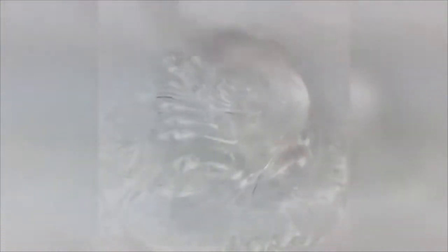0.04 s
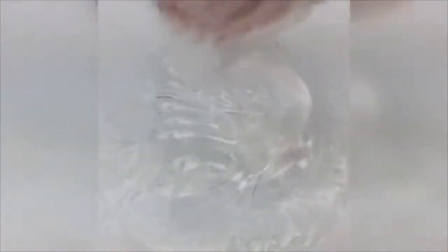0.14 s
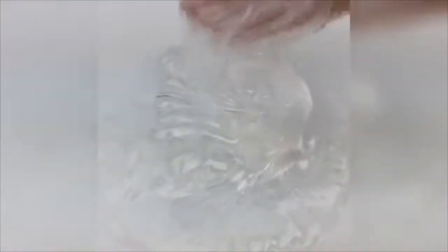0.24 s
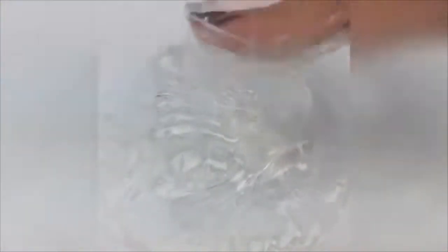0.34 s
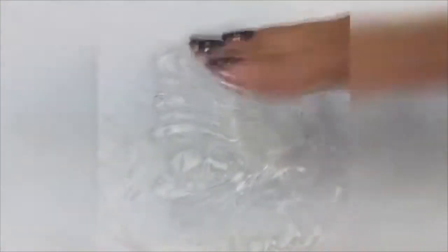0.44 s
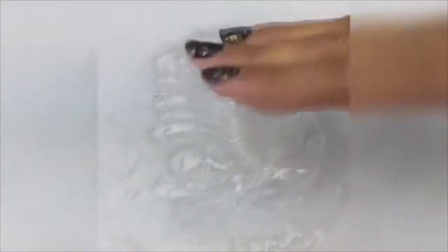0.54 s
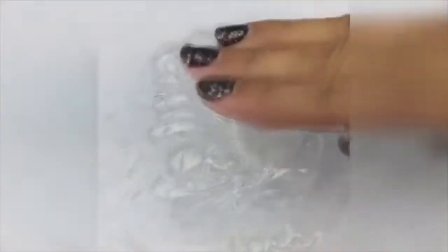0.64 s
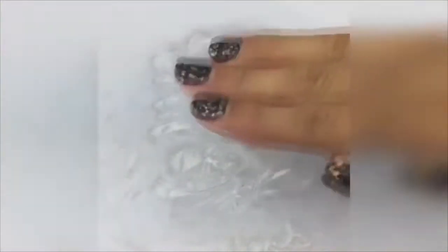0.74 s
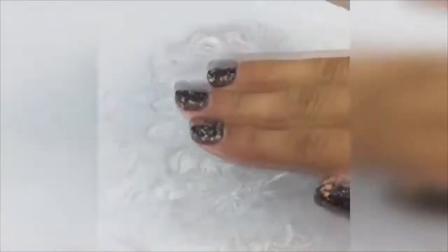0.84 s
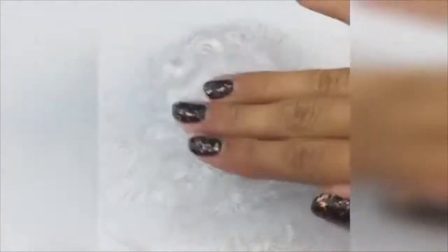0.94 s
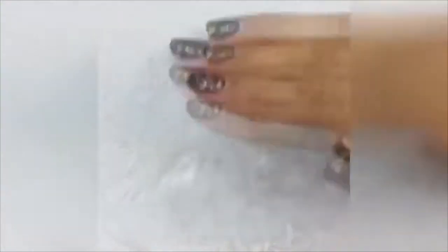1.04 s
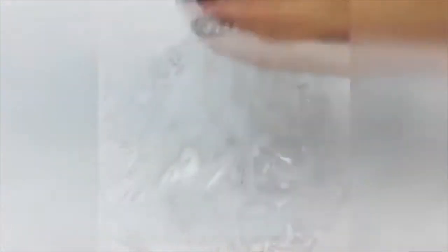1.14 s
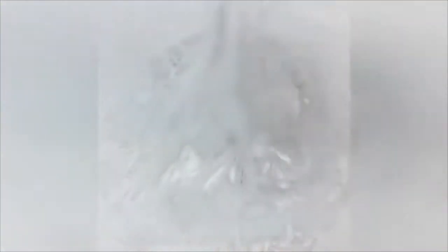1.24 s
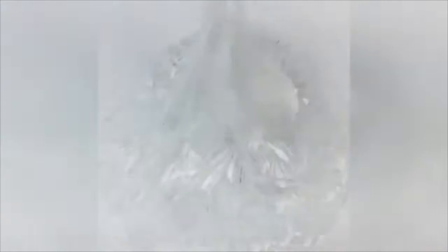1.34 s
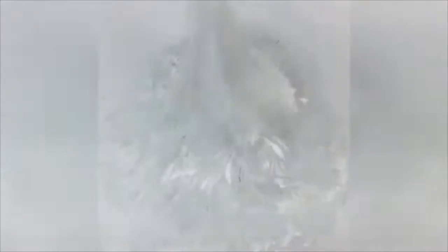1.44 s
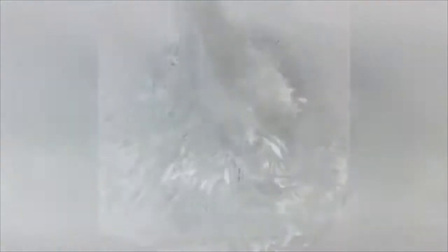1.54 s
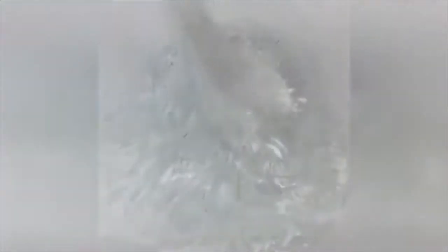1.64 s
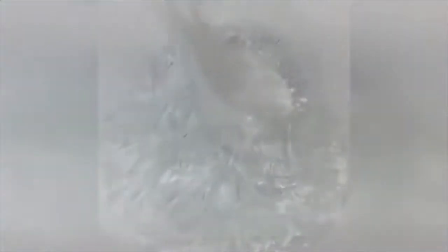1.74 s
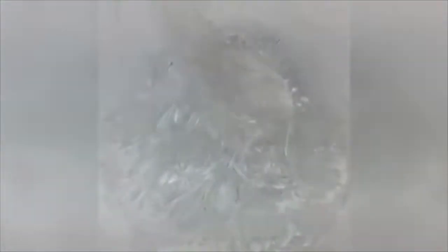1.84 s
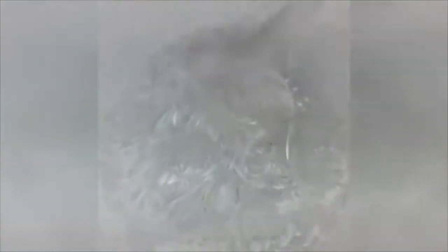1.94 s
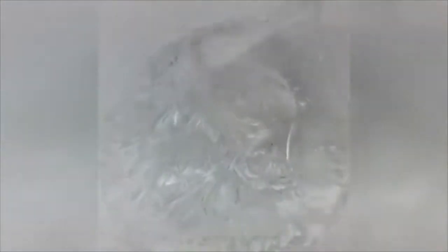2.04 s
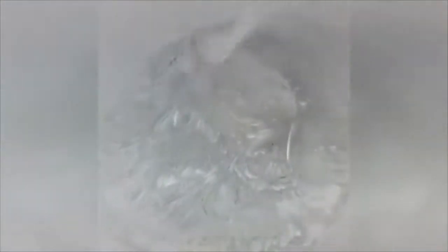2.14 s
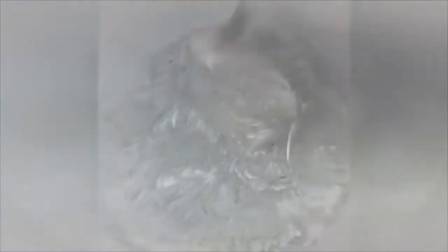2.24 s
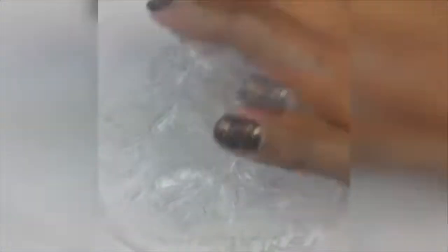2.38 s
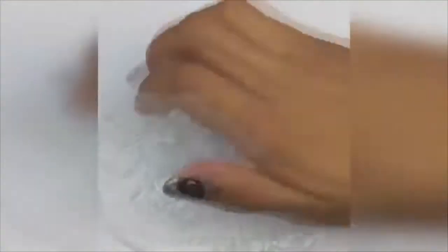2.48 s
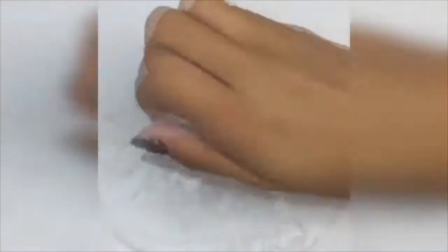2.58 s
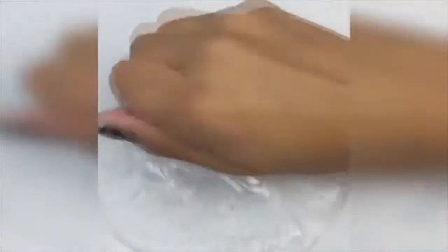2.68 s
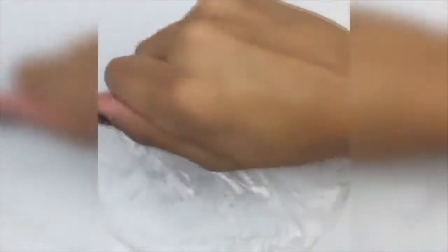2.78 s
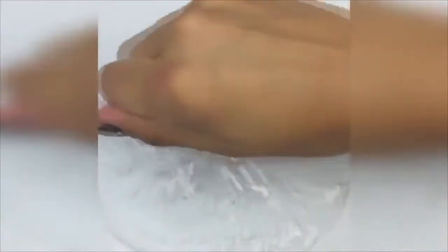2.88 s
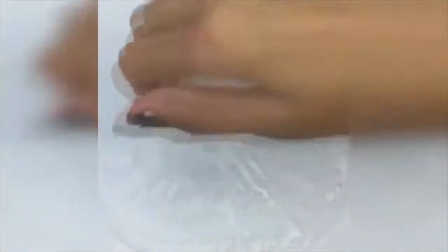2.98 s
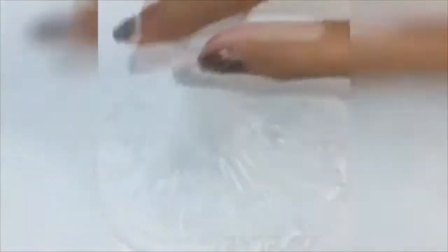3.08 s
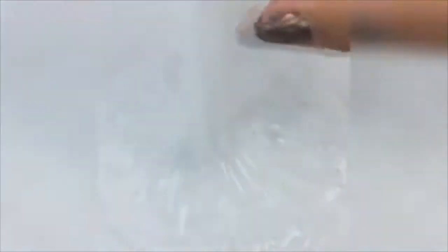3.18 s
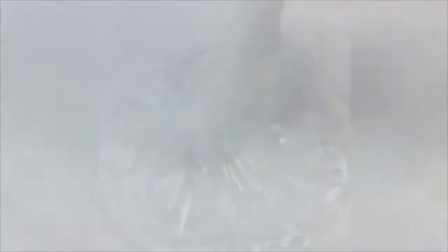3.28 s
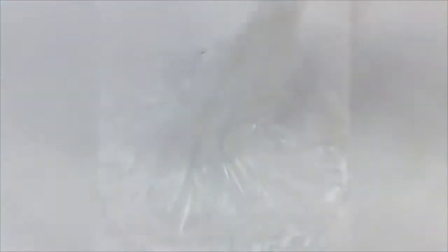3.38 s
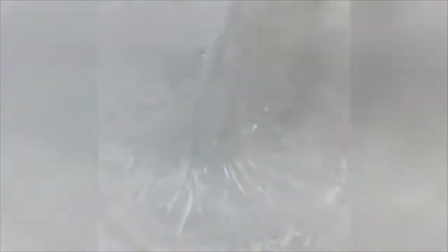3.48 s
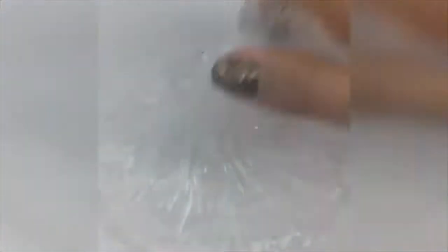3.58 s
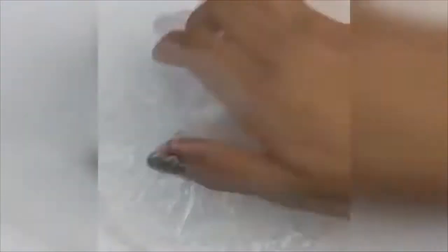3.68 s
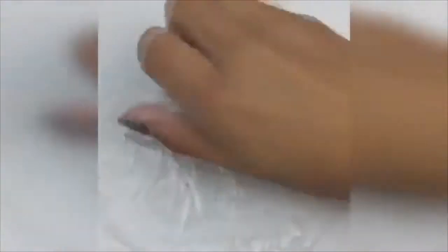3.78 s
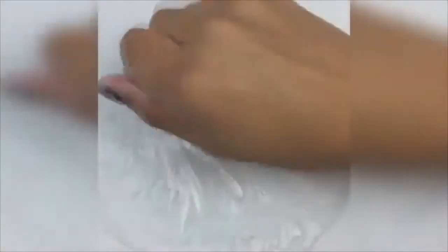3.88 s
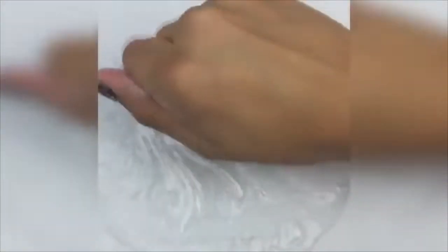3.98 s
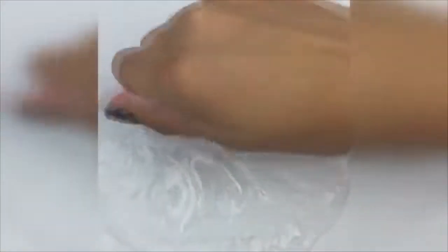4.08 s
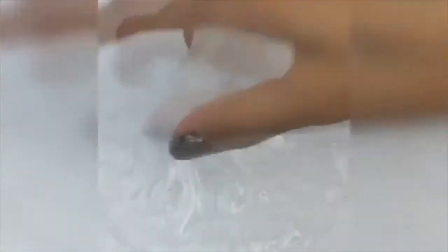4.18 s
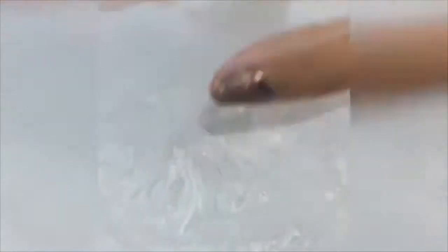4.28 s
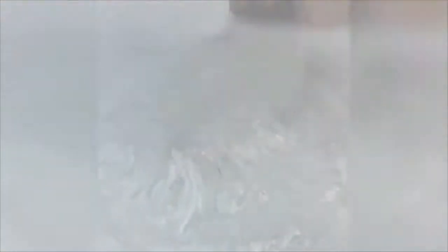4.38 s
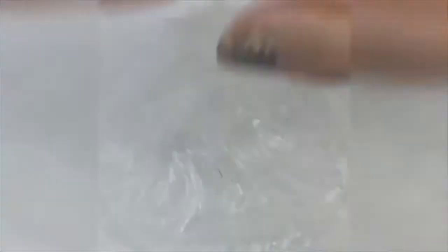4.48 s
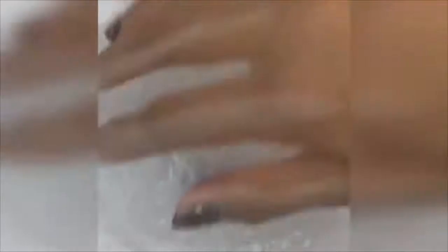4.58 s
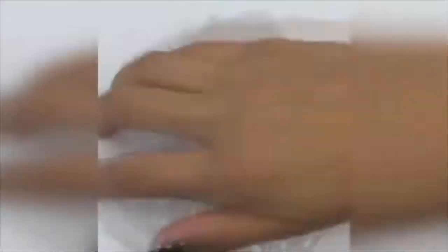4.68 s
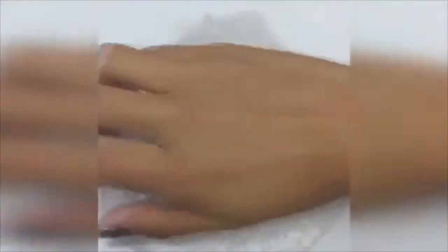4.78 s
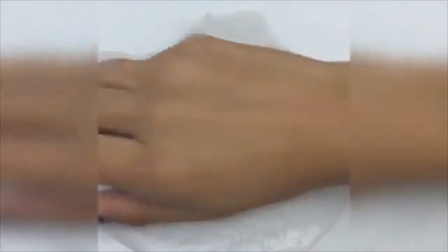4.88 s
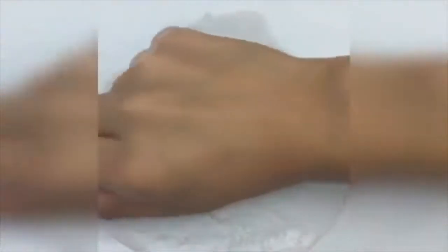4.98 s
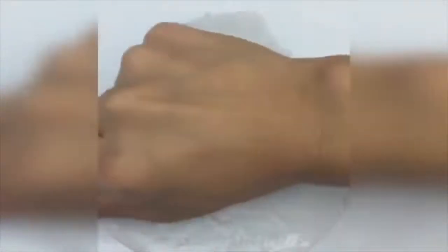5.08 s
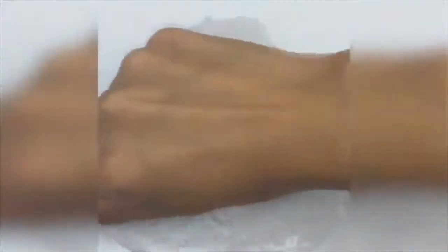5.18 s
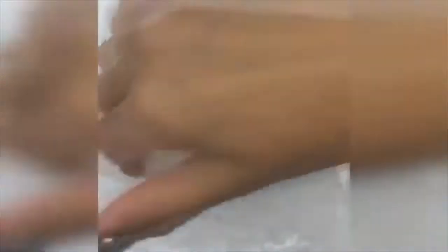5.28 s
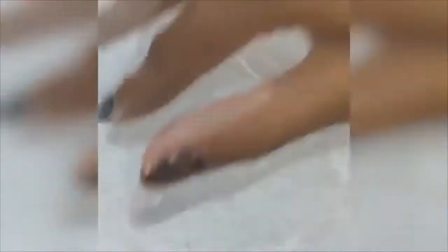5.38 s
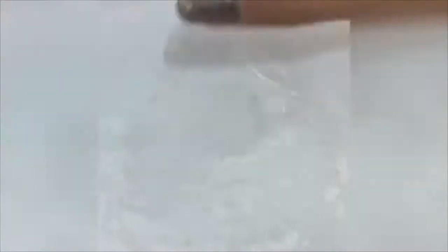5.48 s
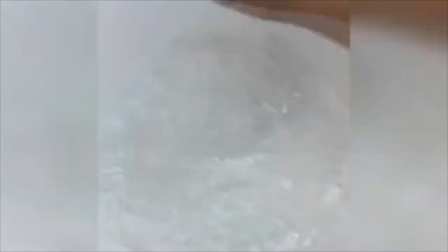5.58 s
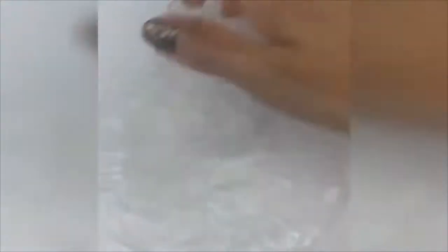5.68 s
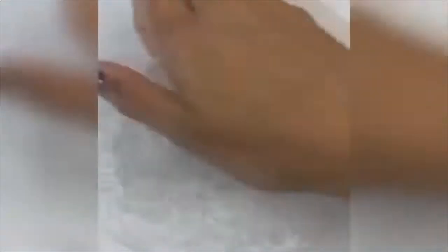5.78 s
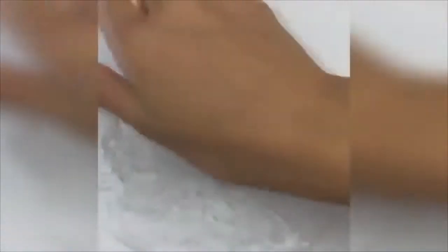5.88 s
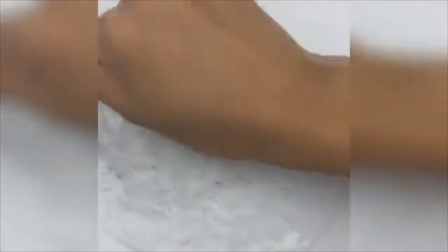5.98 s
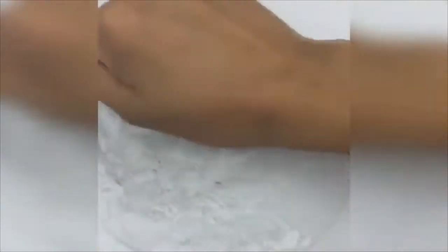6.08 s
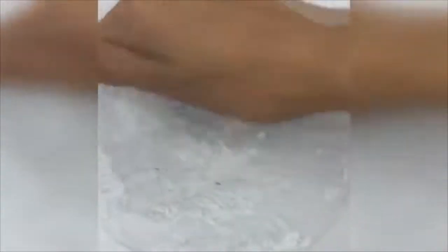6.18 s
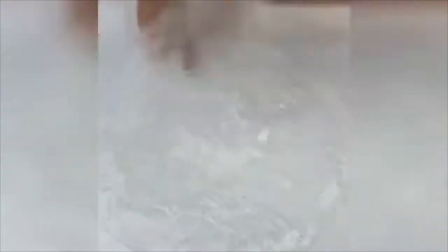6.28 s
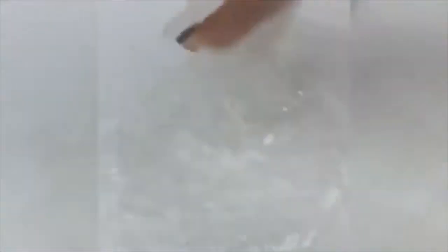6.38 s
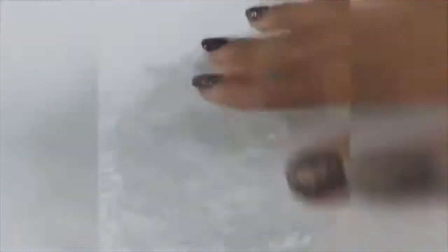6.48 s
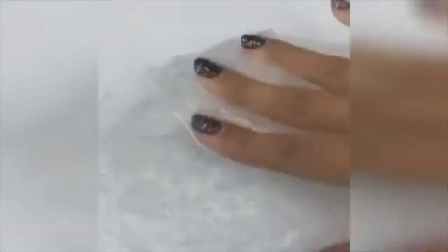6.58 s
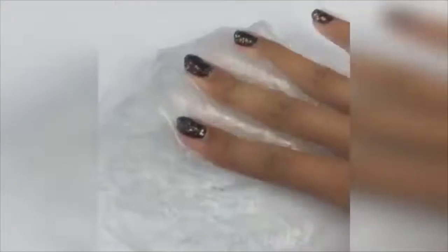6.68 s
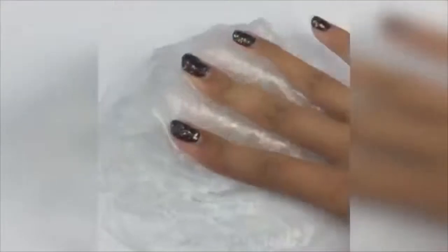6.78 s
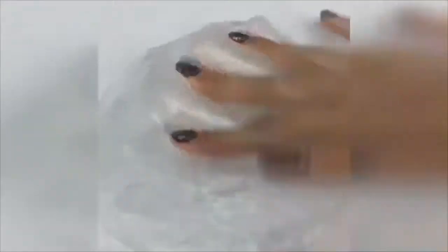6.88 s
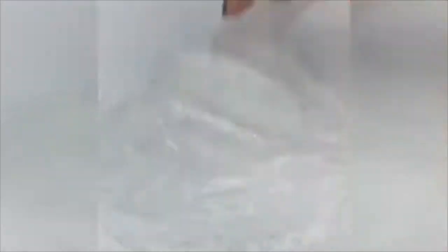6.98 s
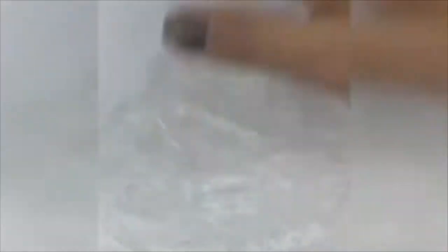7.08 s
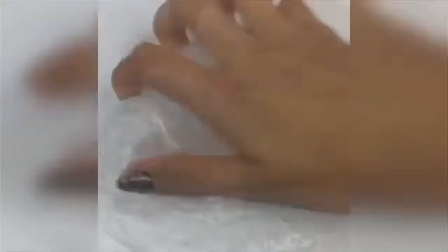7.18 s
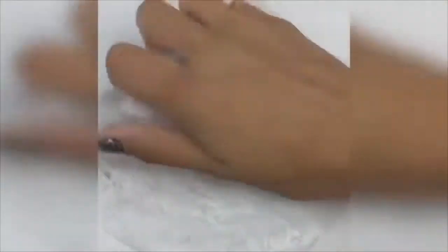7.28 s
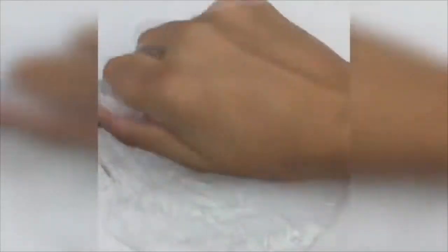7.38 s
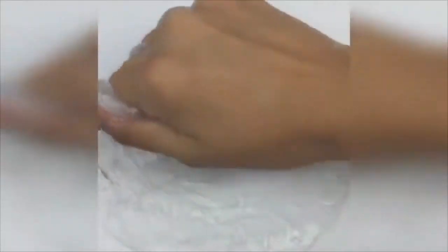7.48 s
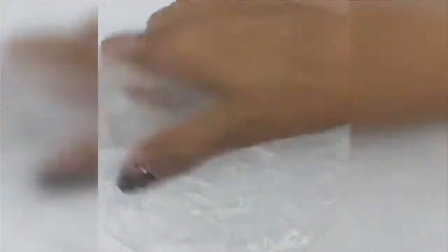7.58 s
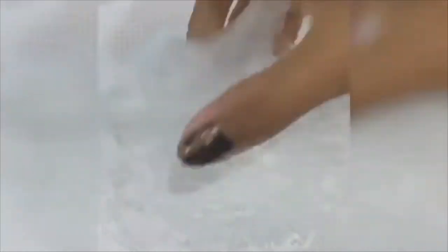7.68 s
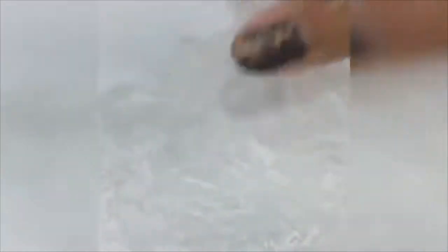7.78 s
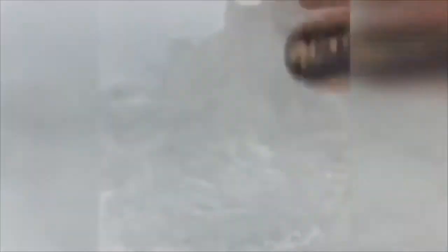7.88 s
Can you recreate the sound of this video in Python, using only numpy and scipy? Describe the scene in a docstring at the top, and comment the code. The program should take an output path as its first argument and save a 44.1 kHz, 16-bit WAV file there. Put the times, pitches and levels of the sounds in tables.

```python
"""In a small quiet room, a hand kneads clear slime in a plastic tub, heard from close by.
Each squeeze swells, holds and dies away in a crackle of tiny bubbles, with stray small pops in it.
Larger air pockets tear open and ring briefly; the loudest pops leave a fizzing tail.
The tub thuds and the table rumbles under each push, and the tub knocks on the table as it shifts.
A faint hiss and rumble lie under it all."""
import sys
import numpy as np
from scipy import signal
from scipy.fft import rfft, irfft
from scipy.io import wavfile
from scipy.ndimage import uniform_filter1d

SR = 44100
rng = np.random.default_rng(int(sys.argv[2]) if len(sys.argv) > 2 else 0)


def transcribe(signal):
    """Save signal, clipped to [-1, 1], as a 16-bit WAV file at the path in sys.argv[1]."""
    frames = np.atleast_2d(signal).T
    limited = np.clip(frames, -1, 1)
    pcm = np.round(limited * 32767).astype(np.int16)
    wavfile.write(sys.argv[1], SR, pcm)


N = 349838

# Tone of the room's background: (frequency [Hz], relative level [dB])
BACKGROUND_COLOUR = [(19, -36), (32, -14), (62, -1.5), (92, -16.5), (126, 1.76), (168, -9.5), (258, -13.5),
                     (324, -16.5), (359, -24), (1280, -28.5), (14000, -37)]
# Larger air pockets; the level is that of the pop's energy spread over 1 ms:
# (time [s], level [dB], pitch [Hz], fade time of the tear [s], boost of the low puff [dB])
AIR_POCKETS = [(.0488, -45, 5440, .0028, 6), (.051, -45, 1780, 0.0017, -19),
               (.7107, -50.5, 4120, 0.0022, 9), (1.2053, -31, 5000, 0.0039, 6.5),
               (1.2248, -26, 2500, 0.0028, -1), (1.268, -42, 940, 0.003, -10),
               (1.4194, -37.5, 1910, 0.013, 0), (1.439, -42, 3920, 0.0028, -6),
               (1.6279, -49.5, 9600, .003, 11), (1.8757, -44, 7550, 0.0069, 0),
               (1.902, -49, 8400, 0.0022, -4), (2.687, -42, 5165, 0.0031, 2.5),
               (2.6934, -32, 992, 0.0036, -9.5), (2.7336, -31, 2280, .0042, -20.5),
               (2.7496, -31, 8000, 0.0016, 0.5), (2.8026, -20.5, 2100, 0.0022, -2.5),
               (2.8212, -24.5, 6660, 0.00043, -13.5), (2.8385, -18, 7450, 0.00062, 6),
               (2.8401, -16, 1980, 0.0041, 0), (2.8659, -14.5, 7600, 0.002, -7.5),
               (2.886, -2.5, 6784, 0.0015, 10.5), (2.8945, -13.5, 690, 0.0025, -4.5),
               (2.902, -20, 236, 0.0035, 0), (2.9119, -5, 5930, 0.0027, 0), (2.914, -6.5, 2040, 0.0011, 8),
               (2.9205, -11, 8800, 0.0022, 0.5), (2.9357, -24.5, 8000, 0.0028, 12),
               (2.9576, -11, 7000, .002, -0.5), (2.9987, -12, 6500, 0.0063, -6),
               (3.0138, -18, 2680, .0018, 3), (3.0779, -32, 5900, 0.0033, -8),
               (3.3533, -36.5, 6056, 0.0024, -15), (3.4119, -27, 10700, 0.0075, -10),
               (3.5102, -25, 8000, 0.0044, -6), (3.617, -48, 6470, .005, -8),
               (3.8958, -42, 2010, 0.0024, -8.5), (3.9943, -14, 1710, 0.0038, -4.5),
               (4.0067, -15, 1718, 0.0014, 1), (4.0128, -15.5, 1400, 0.0038, 4),
               (4.0732, -19.5, 2070, 0.00059, -7), (4.0909, -22, 2680, 0.0014, -5),
               (4.1354, -27, 4200, 0.0028, -7), (4.1653, -26, 4200, 0.0011, -15),
               (4.2089, -19.5, 2180, 0.0041, -19.5), (4.4286, -38, 9000, 0.0036, -10),
               (4.454, -34, 6970, .0014, -5.5), (4.901, -47, 6810, .0066, -7.5),
               (4.9945, -37, 2400, 0.0025, -22.5), (5.0576, -34, 6720, 0.0056, -4),
               (5.16, -19, 2280, 0.0017, -5.5), (5.1798, -29.5, 9940, .0007, 8),
               (5.211, -17.5, 1972, .0019, -4), (5.225, -27.5, 7500, .0016, -13),
               (5.2367, -14.5, 5850, 0.001, 1.5), (5.2416, -7.5, 6200, 0.0022, -13.5),
               (5.2525, -21, 1110, 0.011, 4), (5.2586, -11.5, 620, 0.0056, -8.5),
               (5.4402, -22, 1940, 0.0037, -6), (5.4605, -27, 2580, .004, -26),
               (5.544, -33, 8600, 0.0032, -12), (5.5699, -34, 1270, .0054, 3),
               (5.8861, -29, 2650, 0.0022, 0), (5.9004, -32, 2100, 0.0033, -7.5),
               (5.9196, -30.5, 2416, 0.0027, -3), (6.1107, -37, 6800, .0034, -4.5),
               (6.128, -35.5, 2790, 0.0042, -3), (6.162, -25, 6050, 0.0054, -10.5),
               (6.1687, -10, 4040, 0.0031, -8), (6.1859, -7.5, 4290, .0036, -24.5),
               (6.2371, -0.9, 6666, .0034, 2.5), (6.2388, -11, 2750, 0.0009, -17.5),
               (6.412, -17.5, 2496, 0.0031, 3), (6.4373, -18, 11300, 0.0027, -6),
               (6.5357, -35, 7700, .004, 16.5), (6.7657, -42.5, 11060, 0.0026, 2.5),
               (6.883, -38.5, 10100, 0.001, -12), (6.9281, -41.5, 2500, 0.0031, 6),
               (7.0044, -39, 2564, 0.0019, -25), (7.0937, -14.5, 7130, .006, -5),
               (7.105, -21.5, 9510, 0.0011, 3), (7.157, -29.5, 616, 0.0041, -8),
               (7.235, -48.5, 4040, 0.0039, 4.5), (7.3332, -22.5, 2560, .0043, 3),
               (7.3517, -25.5, 2760, 0.0046, 5.5), (7.3851, -23, 2400, 0.0031, -7),
               (7.4265, -31.5, 5190, 0.0058, -4), (7.5067, -24.5, 9600, 0.003, 9),
               (7.5273, -21, 1680, 0.0044, -3), (7.594, 3.5, 2816, 0.0035, -9.5),
               (7.596, -22, 408, 0.0026, -4)]
# Tone of the click when a pocket opens: (frequency [Hz], relative level [dB])
CLICK_COLOUR = [(40, -36), (150, -22), (270, -7.5), (390, 1), (550, 2), (1100, 0.5), (2200, 3.5),
                (4000, 0.5), (6500, 0), (10000, -2.5), (14000, -1.5)]
# How long the room echoes: (frequency [Hz], time to fade by 60 dB [s])
ECHO_TIMES = [(200, 0.14), (600, 0.23), (1200, 0.32), (3000, 0.23), (7000, 0.21), (14000, 0.13)]
# Swells of crackle: squeezes of the slime, and the fizzing tails after the loudest pops:
# (time at full strength [s], hold [s], level [dB], 20 dB rise time [s], 20 dB fall time [s],
# low boost [dB], treble boost [dB])
CRACKLE_SWELLS = [(1.218, 0.0086, -50, 0.03, .1, 12, -4), (1.367, 0.032, -59, 0.18, 0.035, 7, -4),
                  (1.704, 0.018, -69.5, 0.15, 0.041, 20, 14), (1.882, 0.012, -62, 0.16, 0.064, 0, -1),
                  (2.884, 0.025, -23.5, 0.07, 0.1, 6.5, 2.5), (3.159, 0.026, -35.5, 0.16, 0.16, 4.5, 3),
                  (3.422, 0.013, -42, 0.086, 0.042, -1.5, 3.5), (3.483, 0.019, -45, 0.032, 0.098, -7, 6),
                  (4.055, 0.067, -36.5, 0.066, 0.13, -1, 0.5), (4.303, 0.04, -38, 0.067, 0.13, 6, -1),
                  (4.534, 0.015, -51, 0.038, 0.022, -9, 8), (5.005, .24, -58.5, 0.047, .15, -1.5, -2.5),
                  (5.238, 0.013, -39.5, 0.056, 0.085, -3, -15), (5.444, 0.016, -36, 0.067, 0.094, 0.5, -2),
                  (5.893, 0.016, -51.5, 0.018, 0.093, 6, -14),
                  (6.179, 0.0076, -35.5, 0.042, 0.038, 10.5, 2.5),
                  (6.243, 0.0094, -34, 0.051, 0.09, -11, 2), (6.403, 0.027, -38.5, 0.053, 0.1304, 4, 3.5),
                  (6.51, 0.021, -50, 0.053, 0.035, 17, 4), (6.791, .01, -68, 0.021, 0.1, 8, -7),
                  (6.918, 0.009, -63.5, 0.076, 0.084, 5, -16), (7.096, 0.057, -40.5, 0.032, 0.021, 7, 5),
                  (7.334, 0.11, -54.5, .015, .08, 8, -11), (7.609, 0.0094, -31.5, 0.12, 0.082, -3.5, 6),
                  (7.757, 0.045, -40.5, .06, 0.13, 4.5, 3), (7.86, 0.0075, -40.5, 0.011, 0.061, -1, 10)]
# The hand bears down: (time at full strength [s], hold [s], table strength [dB], tub strength [dB])
HAND_PUSHES = [(2.868, 0.038, -70.5, -44), (3.146, 0.06, -70, -44.5), (3.25, 0.028, -52, -52),
               (3.972, 0.14, -53, -51.5), (4.308, .12, -57, -50), (4.666, 0.33, -51, -68),
               (5.185, .39, -52, -55.5), (5.759, 0.094, -49.5, -66.5), (5.886, 0.037, -63, -46.5),
               (6.182, .08, -53, -50), (6.395, 0.11, -51.5, -53.5), (6.802, 0.039, -53.5, -58.5),
               (7.104, 0.054, -55, -41.5), (7.357, 0.1, -46.5, -42), (7.57, 0.039, -57, -46),
               (7.79, 0.17, -53, -48.5)]
# Tone of the table's rumble: (frequency [Hz], relative level [dB])
TABLE_COLOUR = [(20, -37), (35, -14.5), (52, 3.5), (70, 1.5), (95, -18), (160, -45.5), (400, -74.5)]
# Tone of the tub's thud: (frequency [Hz], relative level [dB])
TUB_COLOUR = [(45, -30.5), (80, -8.5), (113, 3.5), (165, -8.5), (230, -10), (320, -17.5), (600, -54),
              (1500, -76.5)]
# The tub knocks on the table: (time [s], strength [dB])
TUB_KNOCKS = [(4.883, -34.5), (5.562, -39.5), (5.574, -39.5), (5.889, -35.5), (6.422, -32.5), (6.441, -44),
              (6.8, -39.5), (7.098, -28), (7.117, -47), (7.158, -31.5), (7.335, -33.5), (7.352, -35),
              (7.384, -27)]
# Notes of the knocked tub: (pitch [Hz], relative level [dB], time to fade by 60 dB [s])
TUB_NOTES = [(109, 4.5, 0.12), (159, 2, 0.084), (279, -2.5, 0.041)]


def amp(db):
    """Turn decibels into a factor to multiply a sound by."""
    return 10 ** (np.asarray(db) / 20)


def unit(x):
    """Scale a signal to an average (rms) strength of 1."""
    return x / np.sqrt(np.mean(x ** 2) + 1e-20)


def read(points, hz):
    """Look up a value by frequency, joining the points with straight lines on a pitch scale."""
    point_hz, value = np.transpose(points)
    return np.interp(np.log(hz + 1), np.log(point_hz + 1), value)


def add(mix, time_s, sound):
    """Lay a sound into the mix at the given time."""
    part = mix[max(round(time_s * SR), 0):][:len(sound)]
    part += sound[:len(part)]


def noise(colour):
    """Steady noise of strength 1 with the given tone."""
    gain = amp(read(colour, np.fft.rfftfreq(N, 1 / SR)))
    return unit(irfft(rfft(rng.standard_normal(N)) * gain, N))


def wander(rate_hz):
    """A smooth random curve of strength 1 that changes up to about rate_hz times a second."""
    keep_slow = np.exp(-(np.fft.rfftfreq(N, 1 / SR) / rate_hz) ** 2)
    return unit(irfft(rfft(rng.standard_normal(N)) * keep_slow, N))


def low_and_high(hz, high_hz=4500, low_hz=1100):
    """How much of each frequency counts as low, and how much as treble."""
    return 1 / (1 + (hz / low_hz) ** 4), 1 / (1 + (high_hz / (hz + 1)) ** 6)


def swell(full_at_s, hold_s, rise_s, fall_s, bend=1.1):
    """Power of one swell: it rises, holds and falls; rise and fall are the times for 20 dB."""
    t = np.arange(0, N, 128) / SR
    away = np.maximum((full_at_s - t) / max(rise_s, 1e-3), (t - full_at_s - hold_s) / max(fall_s, 1e-3))
    power = amp(-20 * np.clip(away, 0, 10) ** bend) ** 2
    return np.interp(np.arange(N) / SR, t, power)


def room_background(level_db=-63.5, waver_db=2.3, waver_hz=16):
    """Faint steady hiss over a low rumble that wavers."""
    tone = noise(BACKGROUND_COLOUR)
    low, _ = low_and_high(np.fft.rfftfreq(N, 1 / SR), low_hz=300)
    rumble = irfft(rfft(tone) * low, N)
    hiss = tone - rumble
    waver = unit(amp(waver_db * wander(waver_hz)))
    return amp(level_db) * (hiss + rumble * waver)


def tearing_film(grit, fade_s):
    """A film of slime snaps and rips on for a few milliseconds, about equally at all frequencies."""
    rip = grit * np.exp(-np.arange(len(grit)) / SR / max(fade_s, 1e-4))
    rip[0] = 4.5  # the first snap
    spectrum = rfft(np.pad(rip, len(grit)))
    return irfft(spectrum / np.sqrt(uniform_filter1d(abs(spectrum) ** 2, size=110)))


def pocket_ring(pitch_hz, ring_db, width, puff_db=0, snap_db=0, top_db=0, size=1024):
    """One pocket opens: a broad click with the ringing of its air on top."""
    hz = abs(np.fft.fftfreq(size, 1 / SR))
    low, high = low_and_high(hz)
    _, top = low_and_high(hz, high_hz=10500)
    ring = np.sqrt(1 + amp(ring_db) ** 2 / (1 + ((hz - pitch_hz) / (width * pitch_hz)) ** 2))
    # just above a large pocket's pitch, air moves against the film and cancels part of the click
    dip_db = -6 / (1 + ((hz / pitch_hz - 1.5) / .2) ** 2) * (pitch_hz < 2500)
    gain = ring * amp(read(CLICK_COLOUR, hz) + puff_db * low + snap_db * high + top_db * top + dip_db)
    # turn this tone into a sound that starts at once and then dies away
    spectrum = np.exp(np.conj(signal.hilbert(np.log(gain))))
    click = np.fft.ifft(spectrum).real[:size // 2]
    return click / np.linalg.norm(click)


def pops(pockets, ring_db=5.5, size=1500):
    """Each torn film sets its pocket ringing; large pockets and soft openings sound most hollow."""
    out = np.zeros(N)
    for time_s, db, hz, fade_s, puff_db in pockets:
        snap_db = -6 + 10.5 * max(np.log2(hz / 3240), 0) ** 2  # smaller pockets snap more brightly
        top_db = -4.5 if hz < 6700 else 0  # only the smallest keep their full fizz
        octaves_down = max(np.log2(2500 / hz), 0)
        hollow_db = ring_db + 7 * octaves_down ** 2 + .2 * max(-snap_db, 0)
        # soft slime walls hush small pockets quickly; large ones ring longer, on a narrower pitch
        width = .14 / (1 + (octaves_down / 2) ** 2)
        ring = pocket_ring(hz, hollow_db, width, puff_db, snap_db, top_db)
        tear = tearing_film(rng.standard_normal(size), fade_s)
        pop = signal.fftconvolve(tear, ring)
        pop *= np.sqrt(.001 * SR / np.sum(pop ** 2))
        add(out, time_s - size / SR, amp(db) * pop)  # the snap comes `size` samples into the tear
    return out


def room_echo(sound, level_db=-9, gap_s=.0028, rise_s=.0012, size=16384):
    """Many quick echoes from the table and near walls, each pitch range dying at its own speed."""
    echoes = rng.standard_normal(size) * (rng.random(size) < .15)
    hz, t, bands = signal.stft(echoes, SR, nperseg=128)
    colour_db = read([(150, -3), (700, -7), (2500, -4.5), (7000, -2.5), (14000, 4.5)], hz)[:, None]
    fade_db = 60 * t / read(ECHO_TIMES, hz)[:, None]
    tail = signal.istft(bands * amp(colour_db - fade_db), SR, nperseg=128)[1]
    tail *= np.clip((np.arange(len(tail)) / SR - gap_s) / rise_s, 0, 1)
    return amp(level_db) * signal.oaconvolve(sound, tail / np.linalg.norm(tail))[:N]


def crackle_shape(rest_db=-88):
    """The crackle's level, low boost and treble boost in dB; the strongest swell leads the tone."""
    power, puff, snap = amp(rest_db) ** 2, 0, 0
    for time_s, hold_s, db, rise_s, fall_s, puff_db, snap_db in CRACKLE_SWELLS:
        swell_power = amp(db) ** 2 * swell(time_s, hold_s, rise_s, fall_s)
        power += swell_power
        puff += swell_power * puff_db
        snap += swell_power * snap_db
    return 10 * np.log10(power), puff / power, snap / power


def crackle(level_db, puff_db, snap_db, quiet_per_s=900, loud_per_s=3600, pitch_count=28):
    """Tiny bubbles burst in clumps of like strength, more of them the louder the swell."""
    loudness = np.clip((level_db + 67) / 30, 0, 1)
    bursts_per_s = quiet_per_s + (loud_per_s - quiet_per_s) * loudness
    clump_db = 3.2 * wander(90)
    clicks = (rng.random(N) < bursts_per_s / SR) * amp(clump_db) * rng.choice([-1, 1], N)
    # the typical bubble size drifts, so the pitch of the squelch keeps shifting
    smallness = .55 + .17 * wander(35) + .22 * rng.standard_normal(N)
    smallness = 1 - abs(1 - abs(smallness))  # fold back at 0 and 1
    pitch_index = np.clip(smallness * pitch_count, 0, pitch_count - 1).astype(int)
    bubbles = np.zeros(N)
    for k, hz in enumerate(np.geomspace(650, 13000, pitch_count)):
        ring = pocket_ring(hz, ring_db=19, width=.05)
        bubbles += signal.oaconvolve(clicks * (pitch_index == k), ring)[:N]
    low, high = low_and_high(np.fft.rfftfreq(N, 1 / SR))
    puff, middle, snap = (irfft(rfft(bubbles) * band, N) for band in (low, 1 - low - high, high))
    sound = puff * amp(puff_db) + middle + snap * amp(snap_db)
    # the bubbles of each moment share the energy of the swell
    power = uniform_filter1d(uniform_filter1d(sound ** 2, size=1500), size=900)
    return amp(level_db) * sound / np.sqrt(abs(power) + 1e-12)


def stray_pops(level_db, per_s=39, quiet_db=-72, over_db=7, spread_db=4, low_hz=1400, high_hz=8000):
    """Small pockets burst at random while the slime crackles, louder when the crackle is louder."""
    fade_s, puff_db = .0025, -3.5
    pockets = []
    for slot, (when, strength, smallness) in enumerate(rng.random((int(per_s * N / SR), 3))):
        time_s = (slot + when) / per_s
        crackle_db = level_db[min(int(time_s * SR), N - 1)]
        if crackle_db > quiet_db:
            db = crackle_db + over_db + spread_db * (2 * strength - 1)
            hz = low_hz * (high_hz / low_hz) ** smallness
            pockets.append((time_s, db, hz, fade_s, puff_db))
    return pops(pockets)


def pushes(gain_db=-1, rise_s=.031, fall_s=.08):
    """The table rumbles and the tub thuds as the hand bears down."""
    table_power, tub_power, out = np.zeros((3, N))
    for time_s, hold_s, table_db, tub_db in HAND_PUSHES:
        push = swell(time_s, hold_s, rise_s, fall_s)
        table_power += amp(table_db) ** 2 * push
        tub_power += amp(tub_db) ** 2 * push
    for power, colour in ((table_power, TABLE_COLOUR), (tub_power, TUB_COLOUR)):
        shake = noise(colour)
        # even out the noise so that the push sets how loud it is
        strength = np.sqrt(uniform_filter1d(abs(signal.hilbert(shake)) ** 2 / 2, size=2600))
        out += np.sqrt(power) * shake / strength
    return amp(gain_db) * out


def knocks(rise_s=.0056, size=8000):
    """The hand shifts the slime-filled tub, which hits the table with a soft, short thump."""
    out, t = np.zeros(N), np.arange(size) / SR
    notes = sum(amp(db - 60 * t / fade_s) * np.sin(2 * np.pi * hz * t) for hz, db, fade_s in TUB_NOTES)
    thump = (1 - np.exp(-t / rise_s)) * notes
    for time_s, db in TUB_KNOCKS:
        add(out, time_s, amp(db) * thump)
    return out


def scene():
    """Slime in the tub on its table, in the quiet room; only the slime is given an echo."""
    level_db, puff_db, snap_db = crackle_shape()
    surroundings = pushes() + knocks() + room_background()
    slime = pops(AIR_POCKETS) + crackle(level_db, puff_db, snap_db) + stray_pops(level_db)
    return (slime + room_echo(slime) + surroundings)[None]


def record(dry, ceiling=.9, cutoff_hz=14150):
    """Gently squash the loudest pops, then cut off the very highest treble."""
    squashed = dry / (1 + (dry / ceiling) ** 4) ** (1 / 4)
    treble_cut = signal.firwin(301, cutoff_hz, window=("kaiser", 8), fs=SR)
    return signal.oaconvolve(squashed, treble_cut[None], "same")


dry = scene()
out = record(dry)
transcribe(out)
```